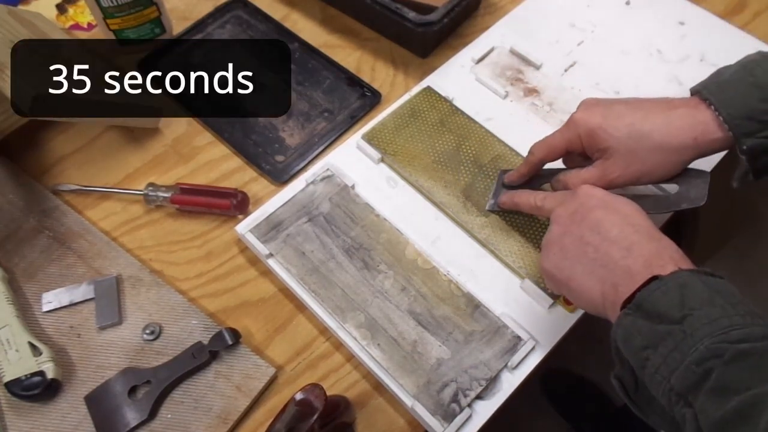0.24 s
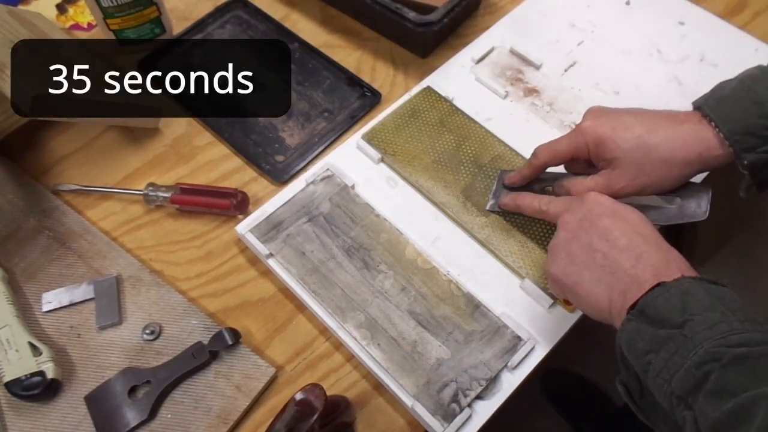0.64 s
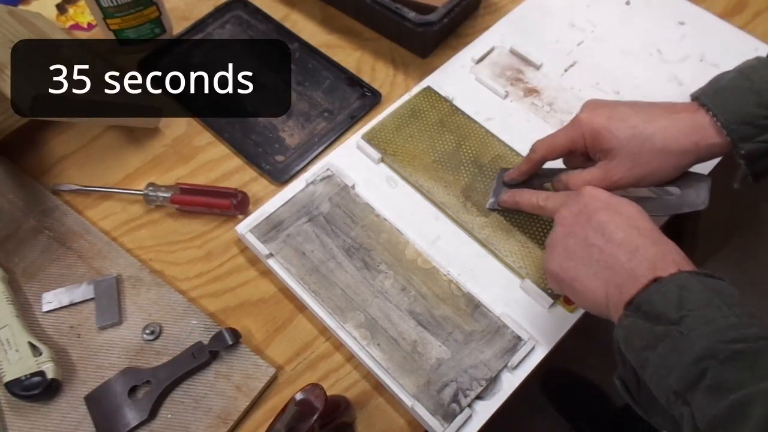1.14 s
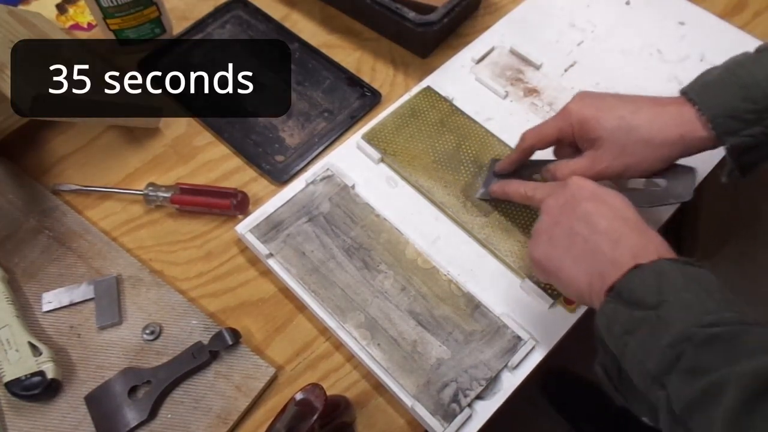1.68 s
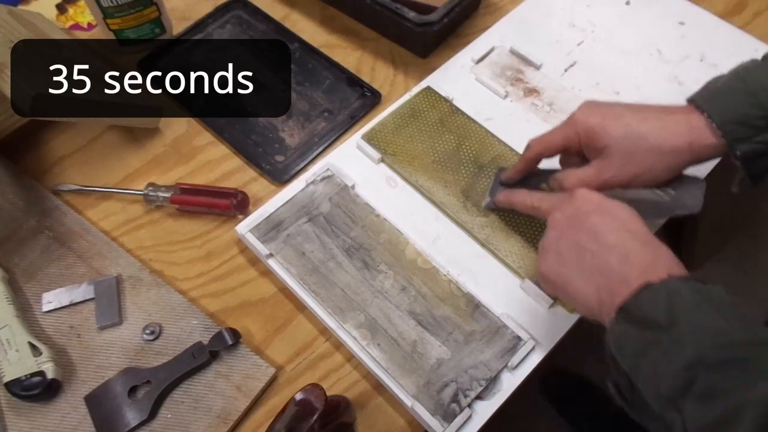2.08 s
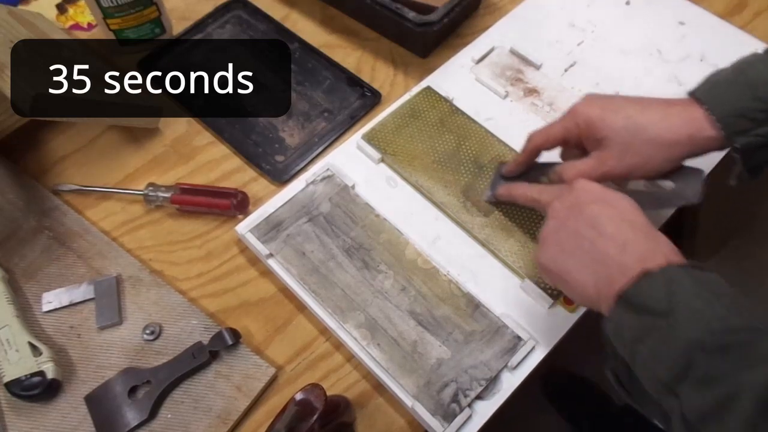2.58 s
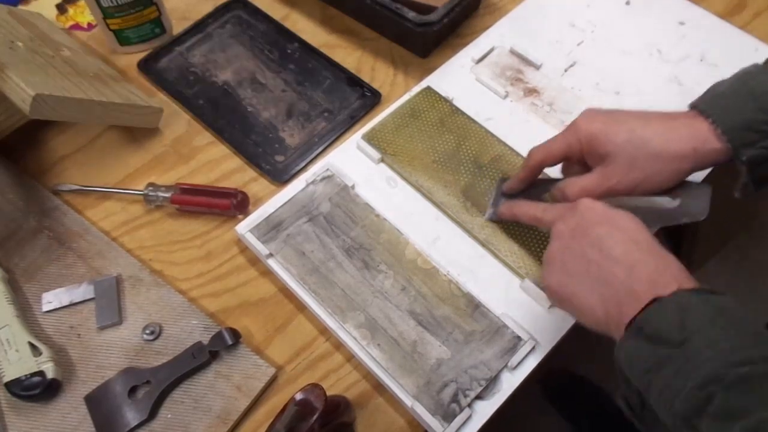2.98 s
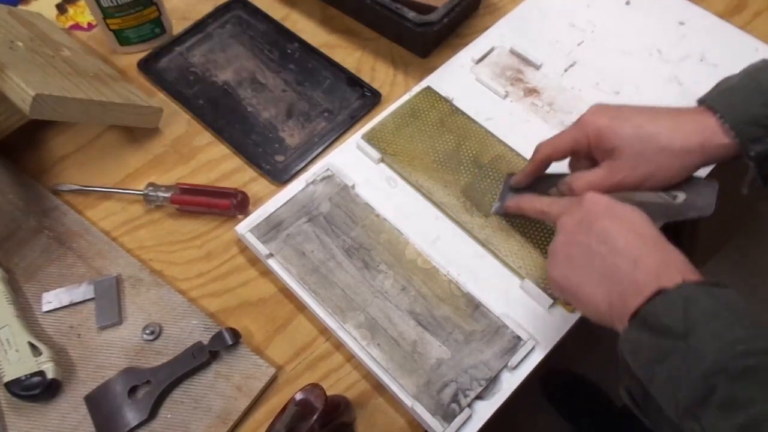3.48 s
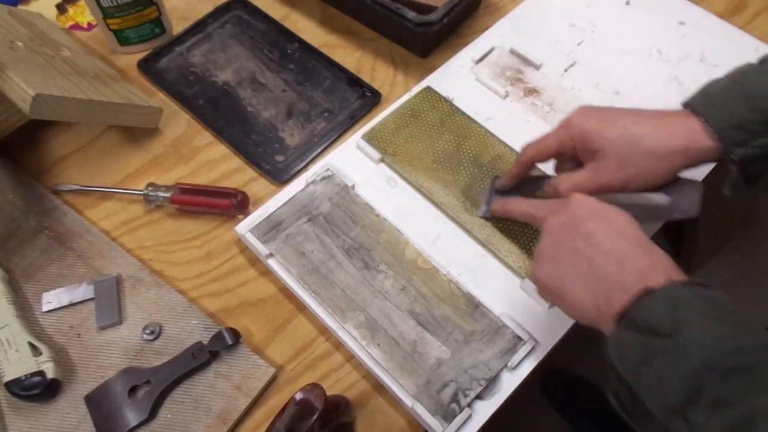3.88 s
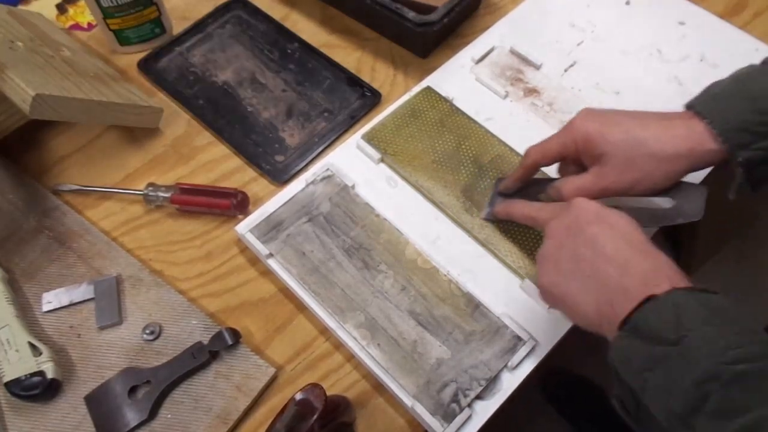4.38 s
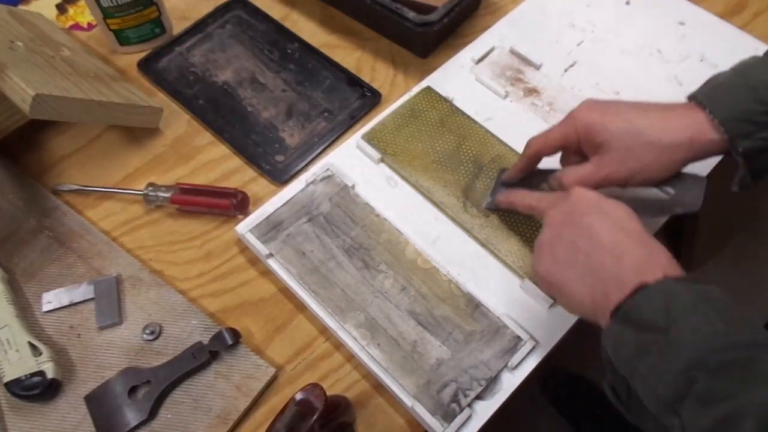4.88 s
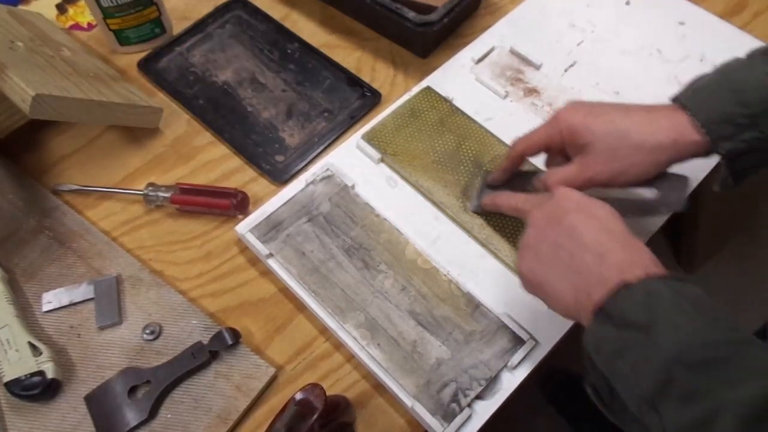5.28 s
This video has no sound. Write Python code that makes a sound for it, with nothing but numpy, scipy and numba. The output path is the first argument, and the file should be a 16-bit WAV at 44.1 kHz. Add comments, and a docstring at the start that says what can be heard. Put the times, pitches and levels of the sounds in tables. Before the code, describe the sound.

After two tiny trial scuffs, a steel blade is rubbed in fast small loops on a gritty sharpening plate, a continuous pulsing hissy scrape.

```python
"""A steel plane iron is rubbed in small quick loops on a diamond plate on a bench, close to a mono microphone.
A dense hail of grit clicks rings the damped blade, its edge, the plate and the bench as filtered modes;
each mode swells at its own point of the loop. Two trial scuffs come first. A short diffuse tail follows the rubbing.
A quiet workshop drone and microphone hiss, both shaped noise, lie underneath."""
import sys
import numpy as np
from scipy import signal
from scipy.fft import rfft, irfft
from scipy.io import wavfile
from scipy.ndimage import uniform_filter1d
from numba import njit

SR = 44100
rng = np.random.default_rng(int(sys.argv[2]) if len(sys.argv) > 2 else 0)


def natural_amplitude(level_db):
    """Convert a level in decibels to a linear amplitude factor, elementwise."""
    exponent = np.asarray(level_db, float) / 20
    return 10 ** exponent


def inscribe(sig):
    """Save sig as 16-bit PCM at rate SR to the path in sys.argv[1].

    A 1-D sig is mono; a 2-D sig holds one channel per row.
    Samples are clipped to [-1, 1] before scaling.
    """
    pcm = np.round(np.clip(np.atleast_2d(sig).T, -1, 1) * 32767)
    wavfile.write(sys.argv[1], SR, pcm.astype(np.int16))


N = 244309

# drone and hiss spectrum, relative: freq_hz, level_db
SHOP_SPECTRUM = [(20, -7), (40, -4.5), (90, -16.5), (200, -14), (400, -11.5), (800, -9), (1350, -10),
                 (1700, -11.5), (3500, -15), (5500, -19), (9000, -20.5), (15000, -20.5)]
# duct resonances added to the drone: centre_hz, half_width_hz, peak_db (over the spectrum there)
SHOP_DUCT = [(467, 18, 0), (583, 18, 5), (766, 42, 2), (1140, 20, 0), (1305, 29, -1)]
SHOP_RMS_DB = -57

# modes of each body: centre_hz, width_hz (nominal), level_db (relative), loop_swing_db, loudest_turn (0-1),
# stroke_swing_db (up at mid-stroke, down at reversals), pitch_sway_hz (up at loudest_turn)
BLADE_MODES = [(4560, 43, -8, 0.37, 0.47, 0.48, 12), (4780, 170, -1, 1.2, 0.88, 0.34, 83),
               (4693, 150, -10, 1.8, 0.045, 0.57, 38), (5197, 224, 0.5, 0.74, 0.067, 0.27, 10),
               (5415, 170, -1.5, 0.67, 0.71, 0.4, 82), (5750, 540, -0.5, 1.2, 0.017, 1, 97)]
EDGE_MODES = [(6290, 1100, -2.5, 2.5, 0, 0.51, 20), (6520, 370, -5, 3.3, 0.17, .6, 20),
              (6785, 360, -1.5, 2.1, .0, 0.22, 7.3), (7780, 1140, 0.5, 0.84, 0, 0.17, 30),
              (8320, 470, -3, 2.9, 0.94, .6, 30), (9010, 960, 1.5, 0.96, 0.68, 0.48, 60),
              (9780, 610, 0.5, 3, 0.78, 0.24, 69), (10380, 290, 1.5, 1.7, 0.59, 0.44, 52),
              (10970, 850, 2.5, 1.6, 0, 0.54, 55), (11920, 1100, 2, 0.77, 0.75, 0.88, 48),
              (13130, 900, 0.5, 0.75, 0.88, 0.52, 73), (13750, 1100, -1, 1.5, 0.75, .6, 75),
              (14640, 1000, -6.5, 1.5, 0.72, .6, 75)]
PLATE_MODES = [(2245, 250, -6.5, 0.43, 0.56, 0.42, 5.7), (2500, 800, -6, 0.96, 0.3, .6, 24),
               (3350, 300, 0, 1.7, 0.92, 0.12, 71), (3736, 180, -4, 0.69, 1, 0.2, 9.8),
               (4110, 240, -5.5, 0.64, 0.36, 0.39, 13)]
BENCH_MODES = [(178, 67, -6.5, 3.5, 0, -1, 4), (308, 187, -3, 0.5, 0.95, 3.5, 3.3),
               (540, 92, 0.5, -1, 0.3, 1.5, 3.9), (725, 91, 4.5, 0.5, 0.22, 2, 8.6),
               (958, 86, 2.5, 0, 0.2, -1.5, 3.5), (1216, 650, 4, 1.5, 0.1, 1, 5),
               (1680, 1160, 0.5, 5, 0.29, 1, 5)]

# trial scuffs before the rubbing: start_s, length_s, blade_db, edge_db, plate_db, bench_db
SCUFFS = [(1.061, 0.056, -62, -67, -60.5, -59.5), (1.144, 0.07, -56.5, -61, -58.5, -64)]
SCUFF_RAMP_S = 0.015
SETTLE_START_S, SETTLE_RISE_S = 1.223, 0.051  # the iron settles and rubbing begins

# slow changes of pressure: time_s, blade_db, edge_db, plate_db, edge_bite_db (extra on each push)
PRESSURE = [(1.25, -51.5, -56.5, -55, 1.5), (1.4, -52, -60.5, -53.5, 8), (1.6, -52, -55, -53.5, 3.5),
            (2.3, -51, -52.5, -53.5, 2.5), (2.8, -49, -49.5, -54, 0.9), (3.4, -47, -47, -52.5, 0),
            (4.2, -48.5, -48, -53.5, -0.2), (4.9, -49.5, -47.5, -53.5, -1), (5.54, -50.5, -49, -54, 3.5)]
# one row per loop: fastest_push_s, push_db, pull_db, lean_turn (0-1, weight lands on the bench), lean_db
STROKES = [(1.17, -2, 0, 0.39, -55), (1.39, -2, 0.5, 0.3, -57), (1.575, 0.1, -.3, .28, -57.5),
           (1.752, -0.3, 1, 0.3, -56.5), (1.928, 1.5, -.4, 0.25, -54.5), (2.1, -0.2, 0.5, 0.32, -57),
           (2.272, 0.6, -2.5, 0.3, -59.5), (2.446, 0.8, 0, 0.33, -58.5), (2.622, .6, -0.2, 0.32, -57.5),
           (2.809, 1.5, -1, 0.28, -57), (2.98, 1, -0.5, 0.32, -54), (3.153, 1.4, -0.7, .33, -55),
           (3.326, 0.5, -0.5, 0.4, -55.5), (3.47, 0.4, 0, 0.41, -55), (3.673, 0.2, -1.1, 0.33, -56),
           (3.838, 1.1, -1, 0.4, -59), (4.016, 1.2, -0.5, 0.3, -53.5), (4.19, 1, 0.5, 0.35, -55.5),
           (4.36, 1.1, 0.7, 0.37, -56), (4.535, -0.1, .3, 0.34, -56.5), (4.734, 1, -0.8, .31, -59),
           (4.885, .1, 0, 0.45, -58.5), (5.064, .5, 0.5, 0.4, -55.5), (5.22, .4, 0.5, 0.58, -57.5),
           (5.4, -0.1, -0.2, 0.43, -55.5), (5.59, 2, .1, .3, -57)]
# brief dips in the rubbing as the iron drags or eases: time_s, stroke_change_db
DIPS = [(1.544, -2), (1.648, -2), (1.814, -1.5), (1.901, -2.5), (1.976, -4), (2.141, -2), (2.188, -4),
        (2.251, -2.5), (2.35, -2), (2.581, -2), (2.738, -5.5), (3.019, -1.5), (3.095, -2.5), (3.25, -1.5),
        (3.4, -2), (3.519, -1.5), (3.615, -4), (3.779, -2.5), (3.961, -3.5), (4.055, -0.5), (4.143, -3.5),
        (4.294, -3), (4.473, -2), (4.661, -1.5), (4.835, -2), (5.008, -3), (5.132, -3.5), (5.273, -3.5),
        (5.358, -1), (5.482, -0.5)]
# share of the stroke dB that each body follows: blade, edge, plate [dB per dB]
STROKE_SHARE = (0.98, 0.8, 0.83)
DIP_SIGMA_S, LEAN_SIGMA_S, BITE_SIGMA_TURNS = 0.011, 0.024, 0.13
BENCH_RUMBLE_DB = -63  # between leans

ROOM_T60_S, ROOM_DB = 0.065, -9.5  # tail relative to the direct sound
OFFSET = -0.0005  # of full scale


def level(x, db):
    """Scale to an rms level."""
    return x * natural_amplitude(db) / np.sqrt(np.mean(x ** 2))


def walk(rate_hz):
    """Random levels held 1 / rate_hz s and slewed twice; spread 1."""
    hold = int(SR / rate_hz)
    steps = np.repeat(rng.standard_normal(N // hold + 1), hold)
    smooth = uniform_filter1d(uniform_filter1d(steps, hold), hold)[:N]
    return smooth / smooth.std()


def shop():
    """Steady drone with a few duct resonances, running into microphone hiss: noise shaped in frequency."""
    hz = np.fft.rfftfreq(N, 1 / SR) + 1  # avoids log(0)
    points_hz, points_db = np.transpose(SHOP_SPECTRUM)
    gain = natural_amplitude(np.interp(np.log(hz), np.log(points_hz), points_db))
    for centre_hz, half_width_hz, peak_db in SHOP_DUCT:
        gain = gain * (1 + natural_amplitude(peak_db) / (1 + ((hz - centre_hz) / half_width_hz) ** 2))
    noise = irfft(rfft(rng.standard_normal(N)) * gain, N)
    return level(noise, SHOP_RMS_DB) * natural_amplitude(0.28 * walk(1.9))


def bump(t, at, sigma):
    """A bell-shaped moment."""
    return np.exp(-0.5 * ((t - at) / sigma) ** 2)


def hands(t):
    """Loop position, and the gains by which pressure and stroke drive blade, edge, plate and bench."""
    push_s, push_db, pull_db, lean_turn, lean_db = np.transpose(STROKES)
    turn = np.interp(t, push_s, np.arange(len(push_s)))  # whole turns: mid-push; halves: mid-pull
    eased = turn - np.sin(4 * np.pi * turn) / (4 * np.pi)  # lingers at mid-push and mid-pull
    half_turns = np.arange(2 * len(push_s)) / 2
    stroke_db = np.interp(eased, half_turns, np.ravel([push_db, pull_db], order="F"))
    stroke_db = stroke_db + sum(db * bump(t, at_s, DIP_SIGMA_S) for at_s, db in DIPS)

    pressure_s, *pressure_db, bite_db = np.transpose(PRESSURE)
    gains = [natural_amplitude(np.interp(t, pressure_s, db) + share * stroke_db)
             for db, share in zip(pressure_db, STROKE_SHARE)]
    bite = bump(turn, np.round(turn), BITE_SIGMA_TURNS)
    gains[1] = gains[1] * natural_amplitude(np.interp(t, pressure_s, bite_db) * bite)

    settle = np.clip((t - SETTLE_START_S) / SETTLE_RISE_S, 0, 1)
    loop_s = np.diff(push_s, append=2 * push_s[-1] - push_s[-2])
    lean_s = push_s + lean_turn * loop_s
    leans = sum(natural_amplitude(db) * bump(t, at_s, LEAN_SIGMA_S) for at_s, db in zip(lean_s, lean_db))
    bench = np.hypot(natural_amplitude(BENCH_RUMBLE_DB) * settle, leans)
    gains = np.array([gain * settle for gain in gains] + [bench])

    for start_s, length_s, *body_db in SCUFFS:
        inside_s = np.minimum(t - start_s, start_s + length_s - t)
        shape = np.clip(inside_s / SCUFF_RAMP_S, 0, 1)
        gains = gains + natural_amplitude(np.array(body_db))[:, None] * shape
    return turn, gains


def grit(share, spread_db):
    """Diamond points catching the steel: a dense hail of clicks of uneven size."""
    touch = rng.random(N) < share
    size = natural_amplitude(spread_db * rng.exponential(size=N))
    return level(touch * size * rng.standard_normal(N), 0)


@njit
def ring(x, centre_hz, width_hz):
    """One resonance: state-variable band-pass with a moving centre, gain 1 there."""
    y, band, low = np.empty(len(x)), 0., 0.
    for i in range(len(x)):
        g, k = np.tan(np.pi * centre_hz[i] / SR), width_hz / centre_hz[i]
        v = (band + g * (x[i] - low)) / (1 + g * (g + k))
        band, low, y[i] = 2 * v - band, low + 2 * g * v, k * v
    return y


def body(clicks, judder, modes, turn, wander_db):
    """Ring a body's modes, each coupled best at one point of the loop and swinging with the strokes."""
    out = 0
    for hz, width_hz, db, loop_swing_db, loudest_turn, stroke_swing_db, sway_hz in modes:
        lean = np.cos(2 * np.pi * (turn - loudest_turn))
        centre_hz = hz * (1 + 0.0035 * walk(8)) + sway_hz * lean  # finger pressure detunes the steel
        force = judder * np.roll(clicks, rng.integers(N))  # each mode feels other spots along the edge
        pass_width_hz = 1.92 * width_hz
        tone = ring(force, centre_hz, pass_width_hz)
        tone = ring(tone, centre_hz, pass_width_hz)  # twice: steep flanks under the fingers
        stroke_swing = stroke_swing_db * np.cos(4 * np.pi * turn)
        gain_db = db + loop_swing_db * lean + stroke_swing + wander_db * walk(11)
        out = out + natural_amplitude(gain_db) * tone / np.sqrt(width_hz)  # evens out mode power
    return level(out, 0)


def rub():
    """Grit drives blade, cutting edge, plate and bench, in the scuffs and then in the loops."""
    turn, gains = hands(np.arange(N) / SR)
    clicks = grit(share=0.27, spread_db=0.5)
    judder = natural_amplitude(0.5 * walk(60))  # the whole contact presses unevenly
    bodies = (BLADE_MODES, EDGE_MODES, PLATE_MODES, BENCH_MODES)
    return sum(gain * body(clicks, judder, modes, turn, wander_db=0.6)
               for modes, gain in zip(bodies, gains))


def room(x):
    """Bench top, hands and walls return a short diffuse tail; its paths change as the hands move."""
    t = np.arange(int(0.4 * SR)) / SR
    envelope = (1 - np.exp(-t / 0.0048)) * np.exp(-np.log(1000) * t / ROOM_T60_S)
    tails = rng.standard_normal((2, len(t))) * envelope
    one, other = (signal.fftconvolve(x, tail / np.linalg.norm(tail))[:N] for tail in tails)
    pose_rad = 1.53 * walk(5)
    return x + natural_amplitude(ROOM_DB) * (one * np.cos(pose_rad) + other * np.sin(pose_rad))


def scene():
    """One microphone, the same on both channels."""
    return np.tile(room(rub()) + shop(), (2, 1))


def roll_off(x):
    """The treble ends steeply here."""
    return signal.sosfilt(signal.butter(12, 15060, fs=SR, output="sos"), x)


def record(dry):
    """Add a small constant converter offset and deliver the mix."""
    mix = dry + OFFSET
    return roll_off(mix)


dry = scene()
out = record(dry)
inscribe(out)
```